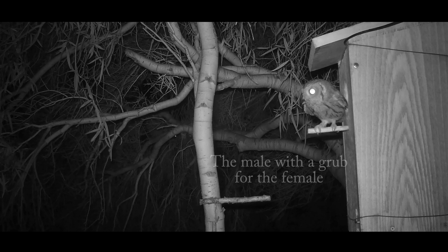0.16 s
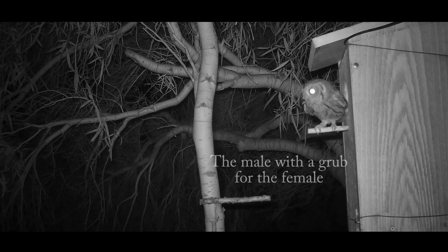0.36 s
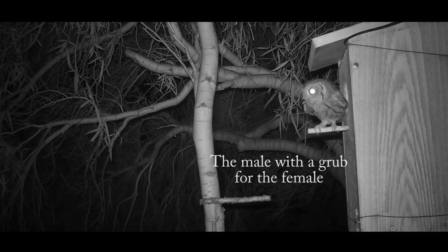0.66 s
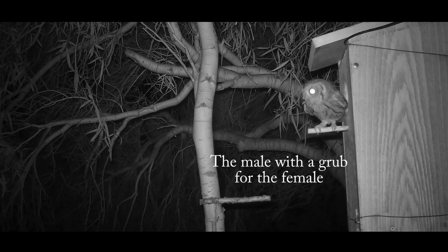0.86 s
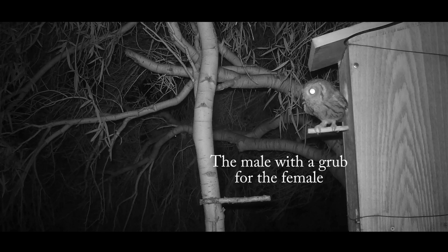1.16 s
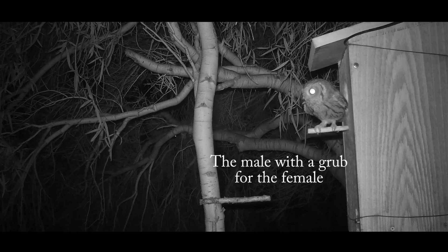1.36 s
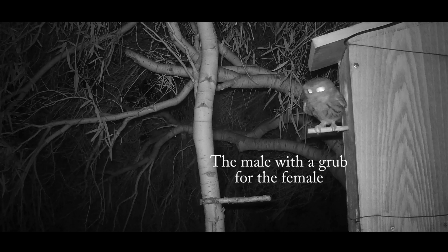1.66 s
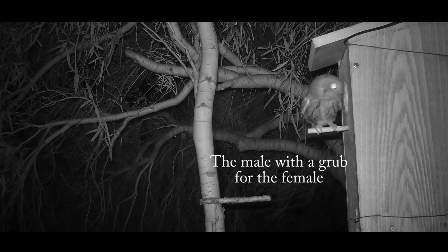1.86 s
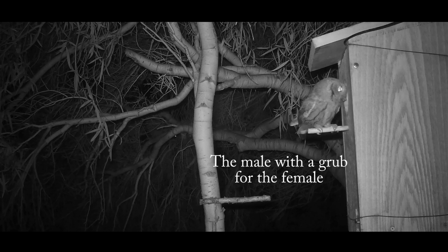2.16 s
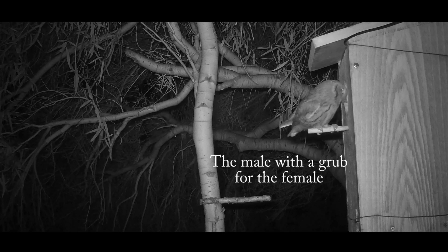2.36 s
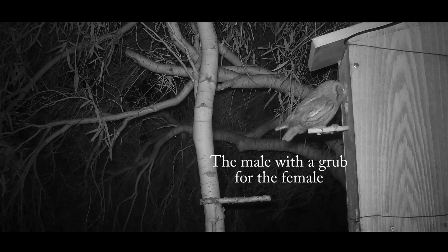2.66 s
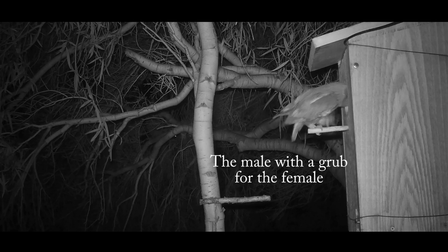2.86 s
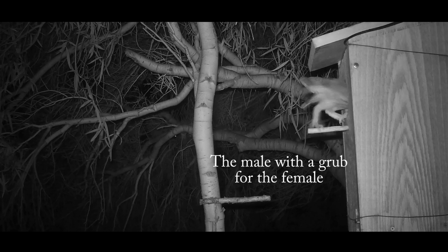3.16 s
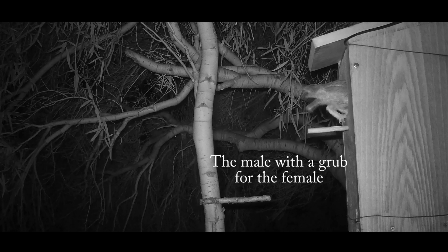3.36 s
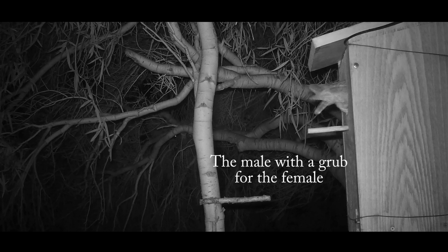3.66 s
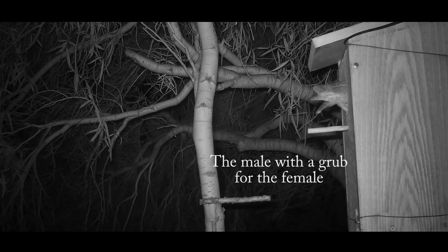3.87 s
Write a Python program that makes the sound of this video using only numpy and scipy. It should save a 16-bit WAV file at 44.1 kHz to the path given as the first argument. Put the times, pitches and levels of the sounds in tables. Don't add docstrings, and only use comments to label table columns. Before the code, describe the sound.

A small owl's soft, rapid hoots rise and swell midway, then a duller, fading trill follows. Steady hiss, hollow hum and tiny ticks run throughout, heard close from inside a wooden nest box at night.

```python
import sys
import numpy as np
from scipy import signal
from scipy.fft import rfft, irfft
from scipy.io import wavfile
from scipy.ndimage import uniform_filter1d

SR = 44100
rng = np.random.default_rng(int(sys.argv[2]) if len(sys.argv) > 2 else 0)


def to_linear_factor(level_db):
    exponent = np.asarray(level_db, float) / 20
    return 10 ** exponent


def store_wav(level_fs):
    pcm = np.round(np.clip(np.atleast_2d(level_fs), -1, 1) * 32767)
    wavfile.write(sys.argv[1], SR, pcm.T.astype(np.int16))


N = 176400

# frequency in Hz, density in dB per Hz.
AIR_SPECTRUM = [(22, -11), (59, -25), (140, -33.5), (333, -37.5), (900, -42), (3080, -45), (9000, -49),
                (15200, -53.5)]
# frequency in Hz, correlation from -1 to 1.
PORT_LIKENESS = [(30, 0.91), (180, 0.79), (550, 0.79), (1650, 0.15), (3100, -0.22), (6500, -0.018),
                 (15000, 0.076)]
# frequency in Hz, left minus right in dB.
PORT_BALANCE = [(60, -1), (180, -2), (550, -4.5), (1650, -2.5), (4970, -4), (15000, -4)]
# time in seconds, centre in Hz, level in dB.
BOX_HUM = [(0, 670, -69), (.08, 540, -55), (.12, 407, -57.5), (.27, 490, -63), (.43, 460, -64.5),
           (.6, 520, -61.5), (.77, 456, -59.5), (.92, 440, -62.5), (1.06, 543, -62), (1.24, 465, -59.5),
           (1.45, 490, -64.5), (1.96, 486, -58), (2.3, 437, -64.5), (2.55, 530, -59), (3.1, 466, -59.5),
           (3.7, 456, -66.5), (3.92, 547, -61)]
# start in seconds, length in seconds, level in dB, centre in Hz,
# width in Hz.
CLAW_SCRAPES = [(0.253, 0.07, -60, 840, 710), (1.398, 0.068, -60.5, 1340, 600),
                (1.933, 0.047, -48.5, 470, 40), (2.325, 0.088, -68, 2280, 900),
                (0.101, 0.017, -58, 5500, 900), (1.057, 0.018, -56.5, 5030, 800),
                (2.682, 0.025, -59, 2880, 700), (2.686, .013, -55, 4730, 700),
                (2.821, 0.046, -59.5, 2820, 2580), (2.916, 0.1, -62, 1010, 800),
                (3.43, 0.1, -63, 1440, 900), (3.29, 0.01, -66, 1620, 200), (3.367, .035, -65, 990, 120),
                (3.597, 0.07, -66, 754, 250), (3.684, .012, -60, 4600, 1200), (2.801, 0.028, -58, 910, 200),
                (2.961, 0.058, -60.5, 700, 200), (3.51, 0.048, -62, 2820, 2010)]
# start in seconds, peak in dB, ring in Hz, tail T60 in
# seconds.
LITTER_TICKS = [(0.0371, -37, 6750, 0.092), (0.058, -35.5, 6660, 0.2), (0.1322, -34.5, 6350, 0.063),
                (0.1823, -43.5, 6400, 0.057), (0.3256, -39.5, 6940, 0.058), (0.548, -43, 6660, 0.071),
                (0.6555, -37.5, 5240, 0.02), (0.757, -36, 6050, 0.073), (0.931, -35.5, 5950, 0.078),
                (1.145, -38.5, 6200, 0.25), (1.272, -35.5, 6700, 0.061), (1.742, -38, 6570, 0.079),
                (1.948, -38, 6670, 0.15), (2.0432, -40, 6800, 0.27), (2.183, -41.5, 6000, 0.33),
                (2.4339, -38.5, 5900, 0.045), (2.4613, -40.5, 6360, 0.06), (2.5643, -38.5, 6650, 0.15),
                (2.6972, -32, 6560, 0.033), (2.7114, -30, 6920, 0.045), (2.7876, -40, 6740, 0.029),
                (2.9861, -60, 6160, 0.051), (3.046, -44, 6400, 0.16), (3.1409, -41, 6340, 0.35),
                (3.3074, -35.5, 6730, 0.1), (3.455, -38.5, 6700, 0.25), (3.69, -41, 6230, 0.032),
                (3.732, -39, 6500, 0.21), (3.8467, -38.5, 6800, 0.24), (3.9684, -43, 6740, 0.049),
                (0.041, -51, 6950, .03), (0.0628, -40, 6900, .05), (0.095, -42, 5300, .05),
               (0.5773, -39, 6750, 0.027), (0.7302, -44, 6710, .06), (0.762, -40, 8000, 0.12),
               (0.8066, -41, 6650, 0.067), (0.9203, -39.5, 6330, 0.044), (1.0964, -43.5, 5740, 0.094),
               (1.1498, -43, 5970, .05), (1.3433, -42, 7200, 0.13), (1.4057, -41, 6650, .04),
               (1.5738, -42, 5200, 0.035), (1.591, -39.5, 6750, 0.044), (1.785, -40, 6600, 0.17),
               (1.9004, -40, 6700, 0.037), (2.142, -40.5, 6900, .05), (2.1548, -40, 6900, .04),
               (2.4114, -42, 6400, 0.033), (2.5012, -40.5, 6500, 0.068), (2.6735, -43, 6530, .08),
               (2.691, -37, 6400, .07), (2.718, -42, 7340, .03), (2.7252, -34, 7160, .05),
               (2.757, -49, 5600, .02), (2.807, -39, 6860, 0.15), (2.8749, -40.5, 6600, .04),
               (2.9497, -39.5, 6530, .05), (3.0699, -39, 6640, 0.06), (3.4757, -41, 6700, .04),
               (3.6127, -44.5, 6930, .05), (3.8604, -43, 5900, .05), (3.8727, -43, 7100, .04),
               (3.902, -41, 6700, 0.071)]
# start in seconds, peak in dB, centre in Hz.
DRY_SNAPS = [(0.835, -38.5, 8100), (0.9356, -43.5, 9440), (0.9844, -46, 10800), (1.103, -49, 9460),
             (1.1427, -48, 8930), (1.944, -42, 8940), (2.0477, -46, 9320), (2.3065, -41.5, 8600),
             (2.7115, -46, 10000), (2.7996, -39, 7900), (2.9874, -42, 13300), (3.308, -53, 9000),
             (3.6561, -42.5, 11500), (3.69, -40, 12600), (3.726, -44, 11600), (3.805, -49, 8790),
             (0.1328, -53, 8000), (1.2726, -52, 8600), (1.419, -49, 8650), (1.9011, -48, 10600),
             (2.08, -48, 10500), (2.674, -46, 9240), (2.8499, -51, 13100), (2.931, -45.5, 8740),
             (3.2385, -54, 8950), (3.4545, -51, 9990), (3.8477, -53, 9450), (3.9689, -48, 9120)]
# start in seconds, length in seconds, peak in dB, pitch in Hz.
RISING_TRILL = [(1.463, 0.0077, -49, 590), (1.529, 0.04, -53.5, 495.6), (1.59, 0.014, -47, 485),
                (1.656, 0.033, -42.5, 515), (1.726, 0.031, -37.5, 536), (1.798, 0.028, -37, 550),
                (1.868, 0.028, -35, 553), (1.936, 0.033, -36.5, 561), (2.01, 0.023, -33.5, 558),
                (2.081, 0.023, -34, 570), (2.152, 0.024, -32, 585), (2.22, 0.026, -34.5, 597),
                (2.286, 0.026, -42, 575), (2.451, 0.0059, -46.5, 600), (2.487, 0.045, -50.5, 621)]
# start in seconds, length in seconds, peak in dB, pitch in Hz.
FALLING_ANSWER = [(2.626, 0.041, -38, 556), (2.709, 0.048, -40, 542), (2.81, 0.047, -38.5, 536),
                  (2.912, 0.042, -41.5, 539), (3.019, 0.041, -43.5, 532.5), (3.116, 0.026, -42.5, 537),
                  (3.207, 0.026, -47.5, 550), (3.3, 0.019, -43.5, 526), (3.372, 0.0293, -46.5, 533),
                  (3.431, 0.031, -45.5, 555), (3.501, 0.029, -48, 523), (3.557, 0.031, -48, 514)]

CAPSULE_HZ = 6670
OWL_PAN_DB, TICK_PAN_DB = -5.5, -5


def even(x):
    return x / np.sqrt(np.mean(x ** 2) + 1e-20)


def read(points, hz):
    f, value = np.transpose(points)
    return np.interp(np.log(hz + 1), np.log(f + 1), value)


def add(mix, start_s, sound):
    part = mix[max(round(start_s * SR), 0):][:len(sound)]
    part += sound[:len(part)]


def resonate(x, hz, width_hz):
    turn = np.exp(2j * np.pi * np.cumsum(hz * np.ones(x.shape[-1])) / SR)
    r = np.exp(-np.pi * width_hz / SR)
    return 2 * (turn * signal.lfilter([1 - r], [1, -r], x / turn)).real


def resonate_twice(x, hz, width_hz):
    return even(resonate(resonate(x, hz, width_hz), hz, width_hz))


def drift(seconds):
    size = int(seconds * SR)
    return even(uniform_filter1d(uniform_filter1d(rng.standard_normal(N), size), size))


def place(x, pan_db):
    return x * to_linear_factor(np.array([[pan_db / 2], [-pan_db / 2]]))


def air():
    level_db, patchy_db, flicker_db = -51, 1.5, 0.93
    capsule_db, capsule_width_hz = 10, 2000
    frames, hz = N // 256 + 5, np.fft.rfftfreq(1024, 1 / SR)
    a, b, c, d, patches = rng.standard_normal((frames, 513, 5)).T
    patches = even(uniform_filter1d(uniform_filter1d(patches, 10, axis=0), 10, axis=1))
    flicker = even(uniform_filter1d(rng.standard_normal(frames), size=3))

    same = np.clip(read(PORT_LIKENESS, hz), -1, 1)[:, None]
    lean_db = read(PORT_BALANCE, hz)[:, None]
    left = a + 1j * b
    right = same * left + np.sqrt(1 - same ** 2) * (c + 1j * d)
    ports = np.array([left * to_linear_factor(lean_db / 2), right * to_linear_factor(-lean_db / 2)])

    capsule = capsule_db / (1 + ((hz - CAPSULE_HZ) / (capsule_width_hz / 2)) ** 2)
    shape_db = np.where(hz < 15, -90, read(AIR_SPECTRUM, hz) + capsule)
    steady_lows = np.minimum(hz / 400, 1)[:, None]
    moving_db = steady_lows * (patchy_db * patches + flicker_db * flicker)
    ports = ports * to_linear_factor(shape_db[:, None] + moving_db)
    return to_linear_factor(level_db) * even(signal.istft(ports, nperseg=1024, noverlap=768)[1][:, :N])


def hum():
    width_hz, lump_db = 158, 2
    s, hz, db = np.transpose(BOX_HUM)
    t = np.arange(N) / SR
    hz = np.interp(t, s, hz)
    hollow = resonate(rng.standard_normal(N), hz, width_hz)
    hollow = even(resonate(hollow, hz, width_hz * 2))
    level_db = np.interp(t, s, db) + lump_db * drift(0.047)
    return place(hollow * to_linear_factor(level_db), OWL_PAN_DB)


def crackle():
    level_db, ticks_per_s, spread_db, gust_db = -63, 1300, 2.5, 6
    gusts = np.tanh(drift(0.0074) + .5 * drift(0.029))
    size = to_linear_factor(spread_db * np.minimum(rng.exponential(1, N), 4) + gust_db * gusts)
    hits = size * rng.choice([-1., 1.], N) * (rng.random(N) < ticks_per_s / SR)
    hz = CAPSULE_HZ + 500 * drift(0.011)
    side = rng.random(N)
    ports = np.array([hits * side, hits * (1 - side)])
    return to_linear_factor(level_db) * place(resonate_twice(ports, hz, 1100), TICK_PAN_DB)


def scrapes():
    x = np.zeros(N)
    for s, length, db, hz, width in CLAW_SCRAPES:
        t = np.arange(0, length, 1 / SR)
        catches = (rng.random(6000) < .03) * 4
        slips = rng.standard_normal(6000) * (0.83 + catches)
        stroke = np.sin(np.pi * (t / length) ** .5)
        add(x, s, to_linear_factor(db) * resonate_twice(slips, hz, width)[:len(t)] * stroke)
    return place(x, -7.5)


def ticks():
    tick_db, rise_s, fall_s, tail_db = 1, .001, .0004, -14
    snap_db, snap_width_hz, snap_t60_s = -1, 8000, .005
    x, t = np.zeros(N), np.arange(5000) / SR
    strike = np.minimum(t / rise_s, 1) ** 3 * np.exp(np.minimum(rise_s - t, 0) / fall_s)
    tail_onset = np.minimum(t / 0.0014, 1) ** 2
    for s, db, hz, t60 in LITTER_TICKS:
        grain_levels = to_linear_factor(3.5 * rng.standard_normal(50)).repeat(100)
        grit = rng.standard_normal(5000) * grain_levels
        ring = np.sin(2 * np.pi * hz * t) * strike
        tail = resonate_twice(grit, hz, 1540) * to_linear_factor(tail_db - 60 * t / max(t60, .01))
        add(x, s, to_linear_factor(db + tick_db) * (ring + tail * tail_onset))
    for s, db, hz in DRY_SNAPS:
        burst = resonate_twice(rng.standard_normal(800), hz, snap_width_hz)
        add(x, s, to_linear_factor(db + snap_db - 60 * t[:800] / snap_t60_s) * burst)
    return place(x, TICK_PAN_DB)


def hoot(start, length, peak_db, pitch_hz, dull_db, sag, skew):
    swell, wobble = 1.55, 0.008
    second_db, third_db = -21, -26.5
    u = np.arange(0, 1, 1 / (swell * length * SR))
    shape = np.sin(np.pi * u ** skew) ** 1.45
    shake = even(uniform_filter1d(rng.standard_normal(9000), 200))[:len(u)]
    hz = pitch_hz * (1 - sag * (u ** 1.2 - .33) + wobble * shake)
    turn = 2 * np.pi * np.cumsum(hz) / SR

    bright = shape ** 2 * to_linear_factor(0.85 * (peak_db + 39.0) + 0.086 * (pitch_hz - 558) + dull_db)
    second = to_linear_factor(second_db) * np.sin(2 * turn + 1)
    third = to_linear_factor(third_db - .3 * abs(pitch_hz - 572)) * np.sin(3 * turn + 2)
    tone = np.sin(turn) + bright * (second + third)
    shape = shape * to_linear_factor(0.6 * np.roll(shake, 900, axis=0))
    return start - .3 * length, to_linear_factor(peak_db + OWL_PAN_DB / 2 - .8) * shape * tone


def owls():
    lag_s, echo_db, echo_t60_s = .0001, -15, .09
    x = np.zeros(N)
    for row in RISING_TRILL:
        add(x, *hoot(*row, dull_db=0, sag=0.074, skew=0.73))
    for row in FALLING_ANSWER:
        add(x, *hoot(*row, dull_db=-8, sag=.12, skew=.72))
    t = np.arange(6000) / SR
    tail = rng.standard_normal((2, 6000)) * to_linear_factor(-60 * t / echo_t60_s) * (t > .004)
    echo = signal.fftconvolve(x[None], tail / np.linalg.norm(tail[0]), axes=1)[:, :N]
    direct = np.array([np.roll(x, round(lag_s * SR), axis=0), x])
    return place(direct + to_linear_factor(echo_db) * echo, OWL_PAN_DB)


def scene():
    return air() + hum() + crackle() + scrapes() + ticks() + owls()


def band_limit(x):
    return signal.sosfilt(signal.butter(12, 15680, fs=SR, output="sos"), x)


def record(dry):
    edge_hz = 15050
    start, end = np.array([[-0.0013], [0.0072]]), np.array([[-0.033], [-0.03]])
    settle_s = np.array([[0.81], [1.12]])
    offset = end + (start - end) * np.exp(-np.arange(N) / SR / settle_s)
    hz = np.fft.rfftfreq(N, 1 / SR)
    dull = irfft(rfft(dry) * to_linear_factor(-np.clip((hz - edge_hz) / 40, 0, 14)), N)
    return band_limit(dull + offset)


dry = scene()
out = record(dry)
store_wav(out)
```